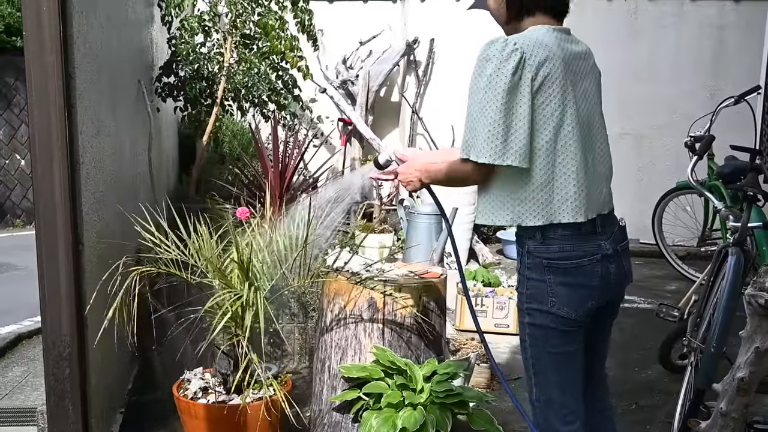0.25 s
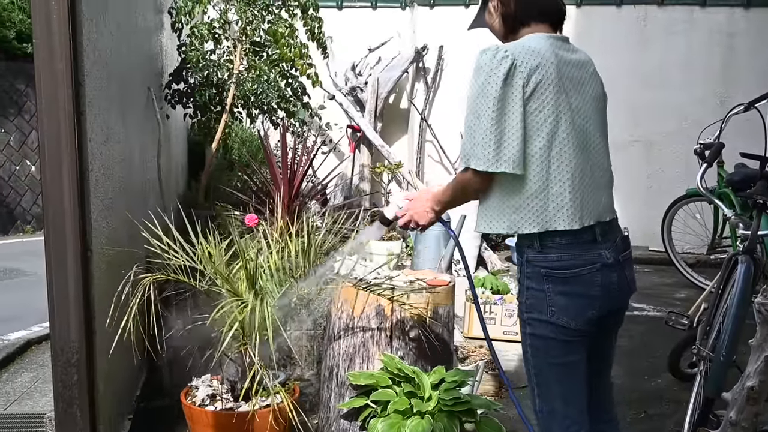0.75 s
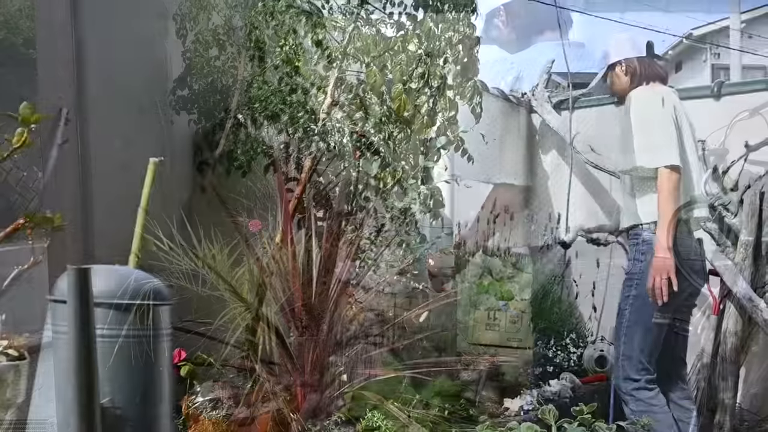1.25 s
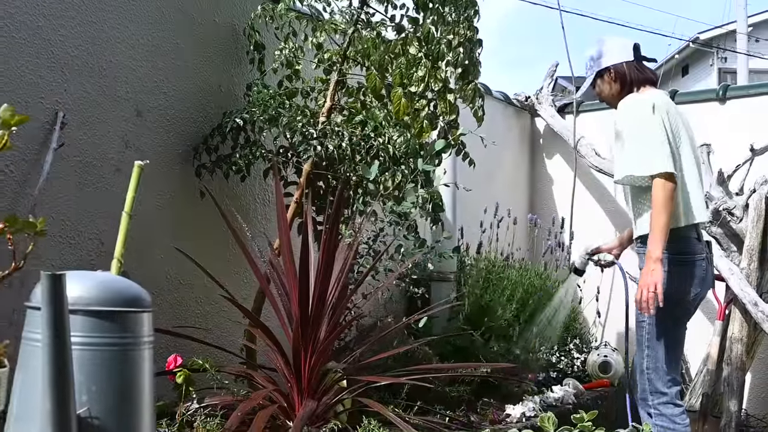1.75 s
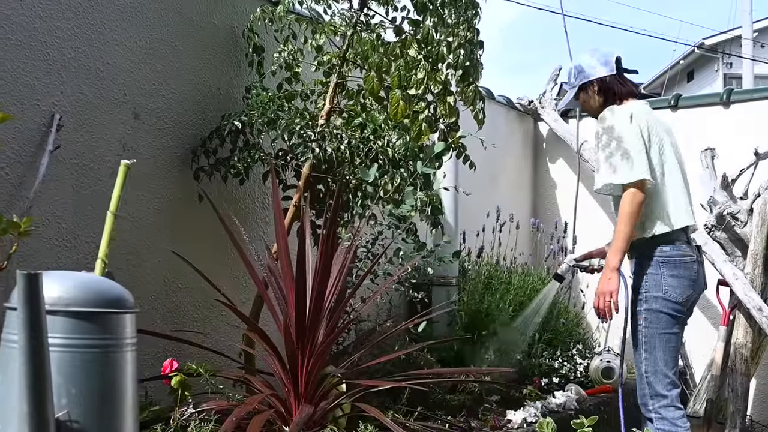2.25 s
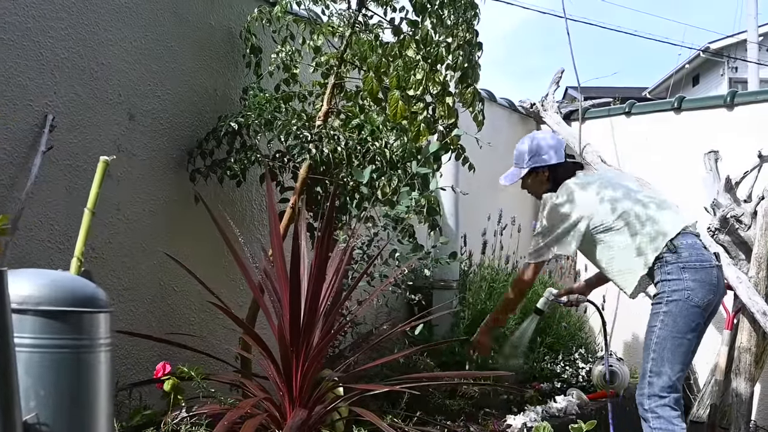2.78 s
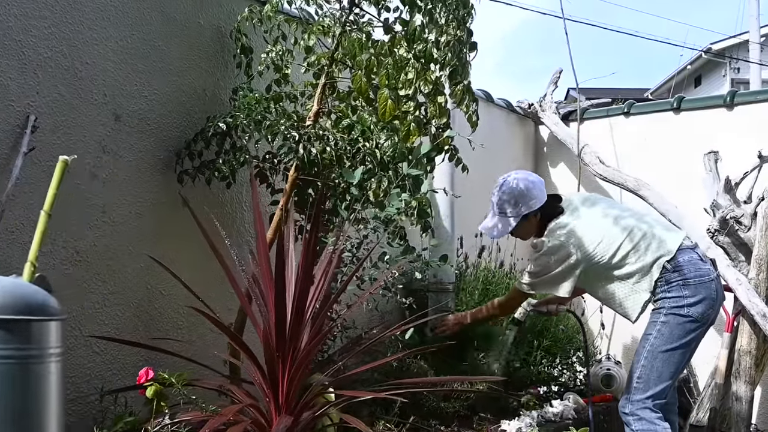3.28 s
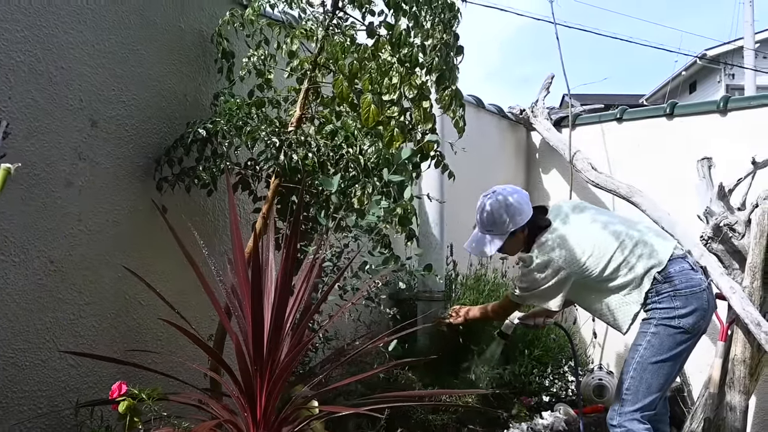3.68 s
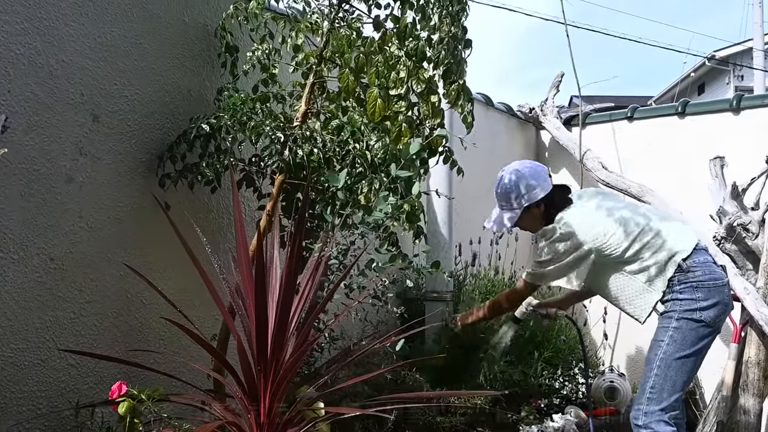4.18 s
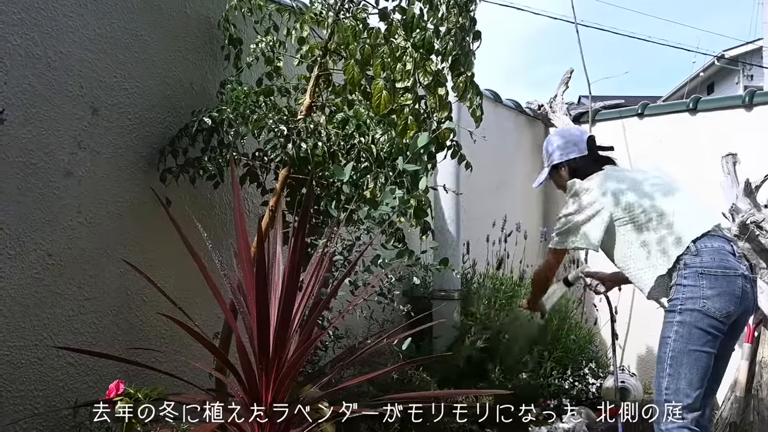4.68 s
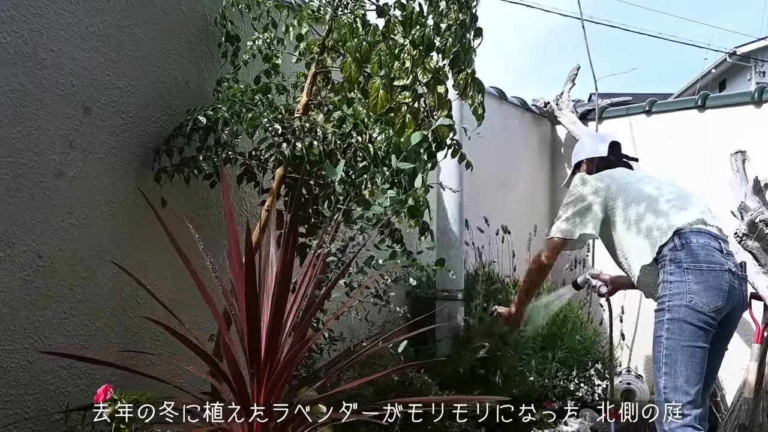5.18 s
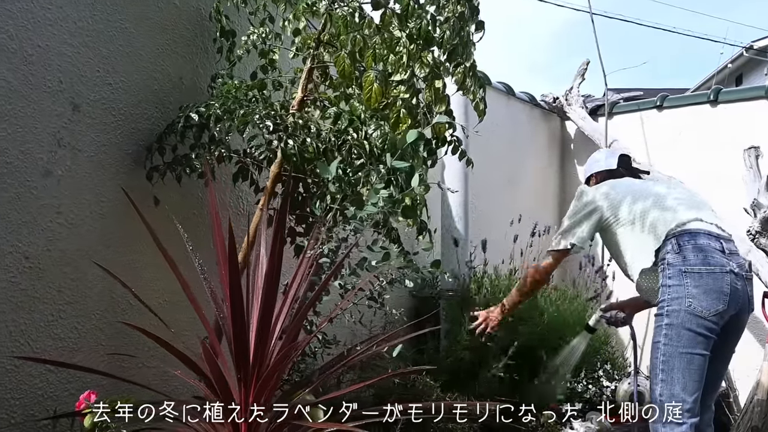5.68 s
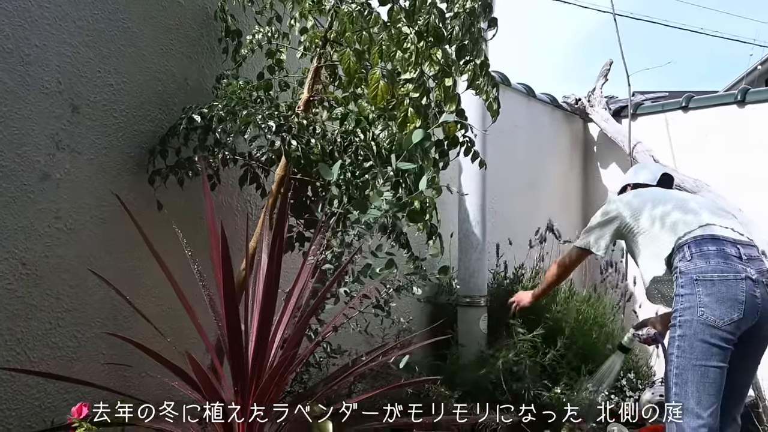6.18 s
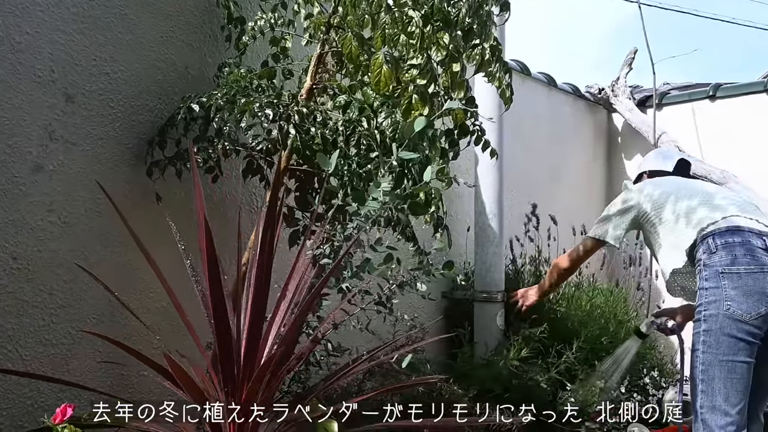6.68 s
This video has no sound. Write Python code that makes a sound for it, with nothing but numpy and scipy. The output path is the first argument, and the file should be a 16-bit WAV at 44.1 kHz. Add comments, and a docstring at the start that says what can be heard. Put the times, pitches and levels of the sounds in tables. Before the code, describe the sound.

A garden hose nozzle hisses over leaves and a pot, clicks as its head turns, then eases off for a second and surges back.

```python
"""In a walled garden, a hose nozzle waters plants. Random drop impacts, filtered by foliage and a pot, form the spray.
The nozzle head clicks, the jet drums in wet hollows, then the spray eases off for about a second and returns.
Lone drops smack leaves, bubbles plop, and the valve whistles faintly as a wavering sine.
Shoes scuff as filtered grit, heels knock and the hose creaks once as decaying tones.
A town murmurs in coloured noise, with a hum and a far motor. The sound is nearly mono."""
import sys
import numpy as np
from scipy import signal
from scipy.fft import rfft, irfft
from scipy.io import wavfile

SR = 44100
rng = np.random.default_rng(int(sys.argv[2]) if len(sys.argv) > 2 else 0)


def wrap_up_sound(samples):
    """Save the sound to the file named by the first command line argument, as 16-bit audio."""
    columns = np.atleast_2d(samples).T
    # keep every value between -1 and 1, then stretch to whole-number steps
    tamed = np.clip(columns, -1, 1)
    steps = np.round(tamed * 32767).astype(np.int16)
    wavfile.write(sys.argv[1], SR, steps)


N = 306348
TIME = np.arange(N) / SR
FREQ = np.fft.rfftfreq(N, 1 / SR) + 1e-3  # offset avoids division by zero


def undb(db):
    """Decibels to gain."""
    return 10 ** (np.asarray(db) / 20)


def unit(x):
    """Scale to rms 1."""
    return x / np.sqrt(np.mean(x ** 2))


def curves(table):
    """Interpolate each column of a timed table to one value a sample."""
    time_s, *columns = np.transpose(table)
    return [np.interp(TIME, time_s, column) for column in columns]


def noise():
    """White noise."""
    return rng.standard_normal(N)


def walk(rate_hz):
    """Smooth random curve of rms 1, low-passed around rate_hz."""
    lowpass = np.exp(-(FREQ / rate_hz) ** 2)
    return unit(irfft(rfft(noise()) * lowpass, N))


def colour(x, points):
    """Shape the spectrum through (frequency [Hz], level [dB]) points, interpolated in log frequency."""
    hz, db = np.transpose(points)
    gain = undb(np.interp(np.log(FREQ), np.log(hz), db))
    return unit(irfft(rfft(x) * gain, N))


def resonance(f_hz, centre_hz, width_hz):
    """Response of one damped resonance, gain 1 at its centre."""
    return 1 / (1 + 1j * (f_hz * f_hz - centre_hz * centre_hz) / (f_hz * width_hz))


def ring(x, modes):
    """Drive parallel resonances of (centre [Hz], width [Hz], level [dB])."""
    response = sum(undb(db) * resonance(FREQ, hz, width_hz) for hz, width_hz, db in modes)
    return unit(irfft(rfft(x) * response, N))


def band_pass(x, order, lo_hz, hi_hz):
    """Butterworth band-pass."""
    return signal.sosfilt(signal.butter(order, [lo_hz, hi_hz], "band", fs=SR, output="sos"), x)


def zone(x, lo_hz, hi_hz):
    """Keep one frequency range, with soft edges."""
    loss = np.sqrt((1 + (lo_hz / FREQ) ** 8) * (1 + (FREQ / hi_hz) ** 8))
    return unit(irfft(rfft(x) / loss, N))


def swell(centre_s, half_s):
    """Bell-shaped rise and fall."""
    return np.exp(-.5 * ((TIME - centre_s) / half_s) ** 2)


def during(start_s, end_s, rise_s, fall_s):
    """Soft gate between start and end."""
    rise = (1 + np.tanh((TIME - start_s) / rise_s / 2)) / 2
    fall = (1 - np.tanh((TIME - end_s) / fall_s / 2)) / 2
    return rise * fall


def echo(x, lag_s, gain):
    """Add one reflection; its lag may move."""
    return x + gain * np.interp(TIME - lag_s, TIME, x, left=0)


def drops(rate_hz, spread_db):
    """Impacts at random moments; spread_db widens their range of sizes."""
    size = undb(spread_db * np.minimum(rng.exponential(size=N), 5))
    hit = rng.random(N) < rate_hz / SR
    return unit(hit * size * rng.choice([-1, 1], N))


def mist_on_pot():
    """The wide mist covers the pot for longer than the core of the jet does."""
    return during(start_s=.37, end_s=.613, rise_s=.016, fall_s=.0058)


def water(impacts, lo_hz, hi_hz, flutter_db):
    """One size of drops landing on foliage or a resonant pot; swaying leaves make it flutter."""
    # water on foliage: (frequency [Hz], relative level [dB])
    foliage = [(150, -13), (300, -27.5), (600, -12.5), (1200, -6.5), (2200, 0), (3100, -0.5), (4500, -1.5),
               (6300, -1.5), (7800, 1), (9000, -2.5), (10800, -8.5), (12900, -4.5), (14300, -7),
               (15800, -11.5)]
    # pot resonances under the jet: (centre [Hz], width [Hz], relative level [dB])
    pot_modes = [(2110, 170, 11), (2410, 400, 5), (3800, 330, -17), (5280, 250, 3), (5940, 160, 2),
                 (6460, 170, 1), (7260, 190, -3), (8500, 190, 3), (12800, 450, -4), (13600, 500, -15)]
    pot_share = np.clip(.54 * mist_on_pot(), 0, 1)  # share of power
    leaves = zone(colour(impacts, foliage), lo_hz, hi_hz)
    pot = undb(-1) * ring(noise(), pot_modes) + undb(-5) * noise()  # ring plus spilled water
    pot = zone(pot, lo_hz, hi_hz)
    landing = np.sqrt(1 - pot_share) * leaves + np.sqrt(pot_share) * pot
    # the wall just behind combs the sound; the comb shifts as the aim wanders
    lag_s = .0042 * (1 + .017 * walk(1.55))
    combed = echo(landing, lag_s, gain=.11)
    return unit(combed) * undb(flutter_db * walk(28))


def spray():
    """Mist hisses, mid-sized drops splash and heavy drops patter as the jet meets the leaves."""
    # jet moved over the plants: (time [s], mist hiss [dB], splash relative to mist [dB]), before the gains below
    aim_table = [(0, -42.5, -6), (.28, -48, -3.5), (.72, -46.5, -6), (.99, -42.5, -3), (1.05, -40, 2),
                 (1.2, -39.5, 1.5), (1.56, -43.5, -2.5), (2.1, -43.5, -3), (2.5, -43, -2), (2.76, -39, -3),
                 (3.2, -41, 1.2), (3.7, -39.5, -1.5), (3.95, -42.5, -1), (4.2, -41, -4.5), (4.62, -44, 0),
                 (5.7, -39.5, -5), (5.95, -42, -3.5), (6.72, -39, -9)]
    # jet slips off the leaves: (time [s], half length [s], loss [dB])
    gaps = [(1.0, 0.0079, 5), (1.51, 0.017, 6.5), (1.74, 0.023, 8), (2.04, 0.037, 7.5), (2.41, 0.036, 4),
            (3.4, 0.04, 3), (4.39, 0.086, 7.5), (6.84, 0.049, 2.5)]
    # core drums on soil and broad leaves: (time [s], half length [s], heavy-drop gain [dB], splash gain [dB])
    gushes = [(1.08, 0.031, 6, 4.5), (1.39, 0.063, 4, 0), (1.66, 0.085, 5.5, -1.5), (3.215, 0.11, 4, 2),
              (4.583, 0.087, 7.5, 0), (6.914, 0.05, 4, 6)]
    # heavy drops at the reference splash level: (time [s], level [dB])
    patter_table = [(0, -49.5), (3.3, -53.5), (3.8, -54), (6.95, -53)]
    # top-octave gain of the mist at the reference splash level: (time [s], gain [dB])
    fine_table = [(.4, 1), (1.6, -2.5), (3.7, 1.5), (5.8, -1.5), (6.55, -2.5)]
    splash_ref_db = -45

    hiss_db, coarse_db = curves(aim_table)
    gap_loss_db = sum(loss_db * swell(s, half_s) for s, half_s, loss_db in gaps)
    # long lull: the jet is lifted off the bush
    lull_loss_db = 12.5 * during(start_s=4.72, end_s=5.607, rise_s=.035, fall_s=.047)
    aim_db = hiss_db - gap_loss_db - lull_loss_db
    wet_db = aim_db + coarse_db - splash_ref_db

    mist_db = aim_db + 11 * mist_on_pot()
    core_on_pot = during(start_s=.429, end_s=.577, rise_s=.011, fall_s=.0082)
    splash_db = aim_db + coarse_db + 13.5 * core_on_pot
    patter_db = curves(patter_table)[0] + .43 * wet_db
    for s, half_s, heavy_db, leaf_db in gushes:
        gush = swell(s, half_s)
        patter_db = patter_db + heavy_db * gush
        splash_db = splash_db + leaf_db * gush
    # the mist fizzes while the head is between settings
    turning = during(start_s=.81, end_s=1.07, rise_s=.01, fall_s=.01)
    fine_db = curves(fine_table)[0] - .2 * wet_db + 6 * turning

    mist = water(drops(16000, spread_db=0), lo_hz=4100, hi_hz=19000, flutter_db=.81)
    top = signal.sosfiltfilt(signal.butter(2, 9500, "high", fs=SR, output="sos"), mist)
    mist = mist + (undb(fine_db) - 1) * top
    splash = water(drops(11000, spread_db=1.5), lo_hz=1330, hi_hz=4840, flutter_db=.94)
    patter = water(drops(2200, spread_db=0), lo_hz=334, hi_hz=1470, flutter_db=.92)
    return mist * undb(mist_db) + splash * undb(splash_db) + patter * undb(patter_db)


def hollow():
    """Drops drumming in pockets of wet leaves excite narrow bands, some sliding as the jet moves on."""
    # (time [s], half length [s], level [dB], centre [Hz], width [Hz], glide [Hz/s])
    pockets = [(1.052, 0.025, -39.5, 1650, 260, -2000), (1.104, 0.008, -33.5, 2600, 250, -11000),
               (1.24, 0.099, -52, 1495, 130, 0), (1.245, .05, -47, 3690, 330, -1200),
               (1.31, 0.09, -48, 2580, 120, 0), (3.23, .12, -51, 2180, 150, 0),
               (3.6, 0.15, -49, 2935, 120, -150), (3.64, .17, -52, 3160, 80, -150),
               (3.62, .09, -53, 2630, 110, -200), (3.83, .17, -52.5, 2190, 190, 0)]
    impacts, out = drops(3000, spread_db=0), 0
    for s, half_s, db, hz, width_hz, glide_hz_per_s in pockets:
        centre_hz = hz + glide_hz_per_s * np.clip(TIME - s, -2 * half_s, 2 * half_s)
        carrier = np.exp(2j * np.pi * np.cumsum(centre_hz) / SR)
        # shift the band to 0 Hz, low-pass, shift back: a gliding band-pass
        lowpass = signal.butter(2, width_hz / 2, fs=SR, output="sos")
        band = carrier * signal.sosfilt(lowpass, impacts / carrier)
        out = out + undb(db) * swell(s, half_s) * unit(band.real)
    return out


def snaps(table, rebound_s, rebound, body, t60_s, crack, strike):
    """Small hard contacts: a chattering strike with a thin bright crack, a rebound and a short ring."""
    out, t = np.zeros(N), TIME[:SR // 8]
    for s, db, snap_s, lo_hz, hi_hz in table:
        snap = np.exp(-t / snap_s) + strike * (t == 0)
        bounce = rebound * np.exp(-((t - rebound_s) / (rebound_s / 2)) ** 2)
        tail = body * np.exp(-np.log(1000) * t / t60_s)
        chatter = rng.choice([-1, 1], len(t))
        contact = chatter * np.hypot(snap, bounce + tail)
        click = band_pass(contact, 2, lo_hz, hi_hz)
        bright = np.diff(snap * chatter * np.exp(-t / .0007), prepend=0)
        click = click + crack * (hi_hz - lo_hz) / SR * bright
        match = np.sqrt(np.sum(contact ** 2) / np.sum(click ** 2))  # restore contact energy
        start = int(s * SR)
        out[start:start + len(t)] += undb(db) / 2 * click * match
    return out


def nozzle():
    """Each detent snaps, rebounds and rings briefly in the plastic head."""
    # (time [s], relative level [dB], snap decay [s], low edge [Hz], high edge [Hz])
    detents = [(.0324, -15, 0.0019, 4700, 9300), (.0748, -22, .0013, 2500, 9500),
               (.0978, -23, .0012, 5500, 10100), (.114, -28, .001, 7000, 13000),
               (.789, -28, .003, 8000, 15000), (.8045, -23.5, .0025, 7000, 15000),
               (.822, -28, .0015, 6000, 14000), (.8402, -23.5, 0.012, 1700, 4000),
               (.852, -28.5, 0.022, 900, 2400), (.865, -27, .0006, 11000, 15500),
               (.875, -22.5, .004, 6960, 13000), (.884, -23, 0.0026, 5000, 14000),
               (.9085, -22, .001, 9000, 15500), (.928, -29, .001, 12000, 15500),
               (.943, -25, .002, 4000, 14000), (.965, -26, .004, 4500, 10500),
               (.9808, -12, 0.00093, 4600, 8800), (1.019, -24.5, .0018, 8000, 15500),
               (1.03, -26, .0007, 10000, 15000), (1.0808, -10, .0018, 3300, 9300),
               (1.099, -23, .001, 9000, 15000), (1.1237, -8, 0.0016, 2600, 4830),
               (1.1298, -23, .0005, 10000, 15500), (1.1307, -15, .0006, 3200, 5400),
               (1.1465, -24, .002, 6400, 8800)]
    # plastic head resonances: (centre [Hz], width [Hz], relative level [dB])
    head_modes = [(5700, 180, -2), (6320, 300, -2), (7070, 230, 2), (9220, 200, -3)]
    clicks = snaps(detents, rebound_s=.0044, rebound=.22, body=.11, t60_s=.12, crack=1.6, strike=2.0)
    return clicks + undb(-10) * np.std(clicks) * ring(clicks, head_modes)


def smacks():
    """A lone drop slaps a leaf, which hardly rings."""
    # (time [s], relative level [dB], snap decay [s], low edge [Hz], high edge [Hz])
    slaps = [(1.297, -29, .001, 2000, 7000), (1.355, -26.5, .004, 5500, 11000),
             (1.7657, -33, 0.0045, 1200, 4500), (3.4699, -32, .001, 2500, 9000),
             (3.9125, -29.5, .0006, 2500, 9000), (5.0811, -38, .002, 2000, 4200),
             (5.2437, -42, .003, 1490, 3800), (5.8504, -33, .002, 3000, 14000),
             (6.498, -25, .0007, 3500, 13000)]
    return snaps(slaps, rebound_s=.005, rebound=.2, body=.14, t60_s=.05, crack=.4, strike=2.2)


def plops():
    """A fat drop traps a bubble, which rings as a decaying sine."""
    # (time [s], initial level [dB], pitch [Hz], t60 [s])
    bubbles = [(0.101, -35, 1330, 0.026), (0.595, -41, 936, .07), (0.621, -44, 1000, .05)]
    out = 0
    for s, db, hz, t60_s in bubbles:
        t = np.maximum(TIME - s, 0)
        decay_db = 60 * np.minimum(t / t60_s, 2)
        out = out + undb(db - decay_db) * np.sin(2 * np.pi * hz * t)
    return out


def valve():
    """Flow through the valve sings one thin, nearly steady note."""
    # (time [s], mean level [dB])
    whistle_table = [(2.55, -74), (2.75, -62), (3.9, -62), (4.25, -57.5), (4.45, -58), (4.55, -64),
                     (4.66, -62), (4.76, -76), (4.9, -62.5), (5.1, -60), (5.5, -60.5), (5.7, -69),
                     (5.85, -61), (6.15, -60.5), (6.95, -65)]
    hz = 2153 + 2 * walk(24)
    level_db = curves(whistle_table)[0] + walk(9.2)
    return np.sqrt(2) * np.sin(2 * np.pi * np.cumsum(hz) / SR) * undb(level_db)


def shoes():
    """Grit gives way under a sole and thuds in the ground; soft steps are duller."""
    # (time [s], level [dB], half length [s], low edge [Hz], high edge [Hz])
    scuffs = [(0.847, -50, 0.0099, 220, 800), (0.89, -48.5, .014, 210, 1000), (1.057, -59, .06, 170, 500),
              (1.41, -48, .011, 500, 1000), (1.432, -56, .012, 170, 450), (1.462, -54, .012, 400, 900),
              (2.318, -47, 0.014, 230, 1110), (2.335, -58.5, 0.041, 169, 231),
              (2.937, -50.5, 0.024, 587, 1000), (4.563, -50, .013, 300, 950), (4.59, -59.5, .025, 160, 260),
              (4.69, -55.5, .018, 130, 800), (4.84, -61.5, 0.022, 200, 380), (4.943, -63, 0.013, 170, 260),
              (5.865, -52.5, .011, 200, 750)]
    # ground resonances under a shoe: (centre [Hz], width [Hz], relative level [dB])
    ground_modes = [(210, 27, 9.5), (352, 330, 10.5), (606, 280, 5.5), (1110, 430, 18.5)]
    grit, out = ring(drops(2500, spread_db=1.5), ground_modes), 0
    for s, db, half_s, lo_hz, hi_hz in scuffs:
        tread = band_pass(grit, 3, lo_hz, hi_hz)
        out = out + undb(db) * swell(s, half_s) * unit(tread)
    return out


def knocks():
    """A heel knocks the edge of the bed: a few decaying modes, with little bass from so small a heel."""
    # (time [s], relative level [dB], main ring [Hz], t60 [s])
    hits = [(2.308, -48, 330, .04), (5.8515, -46, 365, .07), (5.866, -47, 500, 0.044),
            (6.503, -49, 562, .08)]
    # (multiple of main ring, relative level [dB])
    knock_modes = [(.61, -12), (1, -1), (1.66, -7)]
    out, t = np.zeros(N), TIME[:SR // 4]
    for s, db, hz, t60_s in hits:
        body = sum(undb(mode_db) * np.sin(2 * np.pi * hz * k * t) for k, mode_db in knock_modes)
        start = int(s * SR)
        out[start:start + len(t)] += undb(db) * body * np.exp(-np.log(1000) * t / t60_s)
    return signal.sosfilt(signal.butter(4, 190, "high", fs=SR, output="sos"), out)


def hose():
    """Rubber sticks and slips for a few cycles, slowing as it goes; the overtones die first."""
    # (multiple of slip rate, level [dB], decay [s])
    partials = [(1, -45.5, .026), (2, -49.5, .013), (3, -42, 0.011), (4, -56, 0.0091)]
    creak_s, slip_hz, sag_hz_per_s, rise_s = 4.703, 193.5, 150, .014
    t = TIME - creak_s
    hz = slip_hz - sag_hz_per_s * np.clip(t, -.04, .04)
    phase = 2 * np.pi * np.cumsum(hz * (1 + .02 * walk(68))) / SR
    rise = swell(creak_s, rise_s)
    tone = 0
    for k, db, decay_s in partials:
        envelope = np.where(t < 0, rise, np.exp(-abs(t) / decay_s))
        tone = tone + undb(db) * envelope * np.sin(k * phase)
    return tone * (1 + .3 * walk(98))  # roughness


def town():
    """Coloured noise murmurs beyond the wall, with a resonant hum and a far motor rising in pitch."""
    # (time [s], pitch [Hz], level [dB])
    motor_table = [(.5, 66, -95), (.8, 71.5, -78), (1, 79.8, -67), (1.25, 88, -74), (1.45, 89, -100)]
    # hum: (centre [Hz], width [Hz], relative level [dB])
    hum_modes = [(131, 35, -8.5), (430, 100, -1.5), (707, 33, 1.5), (1350, 200, 0.5)]
    # (time [s], level [dB])
    hum_level = [(0, -56), (1.1, -55), (1.5, -80)]
    # murmur: (frequency [Hz], relative level [dB])
    murmur_colour = [(20, -7), (50, -13.5), (100, -6.5), (150, -5), (200, -0.5), (280, 1.5), (500, 1.5),
                     (1000, 1), (3000, -32), (12000, -16.5)]
    hz, motor_db = curves(motor_table)
    motor_phase = 2 * np.pi * np.cumsum(hz * (1 + .015 * walk(20))) / SR
    motor = undb(motor_db) * np.sin(motor_phase)
    hum = ring(noise(), hum_modes) * undb(curves(hum_level)[0])
    murmur = colour(noise(), murmur_colour) * undb(-59.5 + .55 * walk(7.1))
    return motor + hum + murmur


def murmur_side():
    """Faint coloured noise, later added to one channel and subtracted from the other for width."""
    # (frequency [Hz], relative level [dB])
    side_colour = [(20, -8), (100, -6), (250, -2), (550, 0), (850, -12), (1300, -34), (15000, -24)]
    return undb(-86) * colour(noise(), side_colour)


def scene():
    """All sources sit in the middle; only a trace of the murmur is wide."""
    jet = spray() + hollow() + smacks() + plops()
    mid = jet + nozzle() + valve() + shoes() + knocks() + hose() + town()
    side = murmur_side()
    return np.array([mid + side, mid - side])


def record(dry):
    """The recorder cuts the top with a steep elliptic low-pass."""
    top_hz, ripple_db, stop_db = 15800, .2, 80
    return signal.sosfilt(signal.ellip(10, ripple_db, stop_db, top_hz, fs=SR, output="sos"), dry)


dry = scene()
out = record(dry)
wrap_up_sound(out)
```